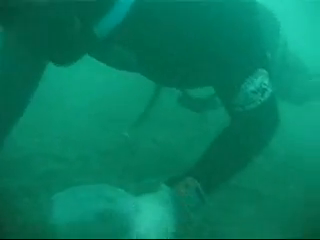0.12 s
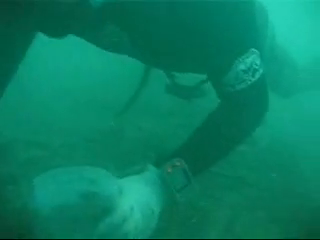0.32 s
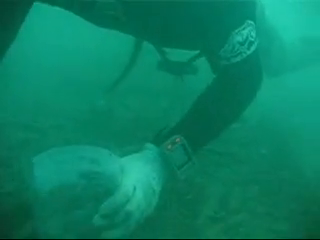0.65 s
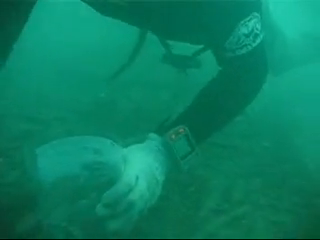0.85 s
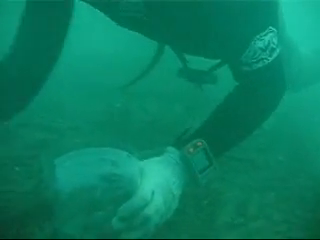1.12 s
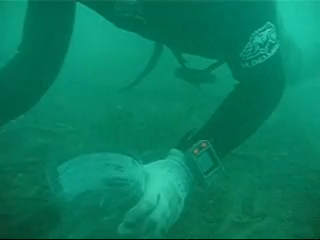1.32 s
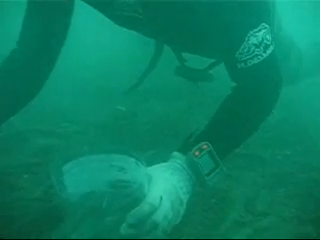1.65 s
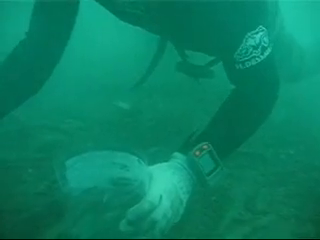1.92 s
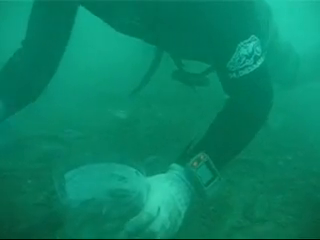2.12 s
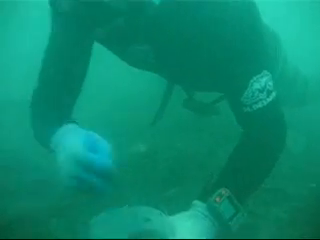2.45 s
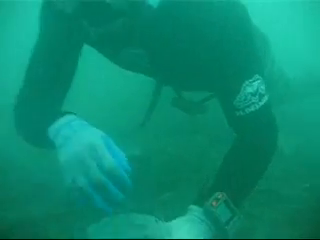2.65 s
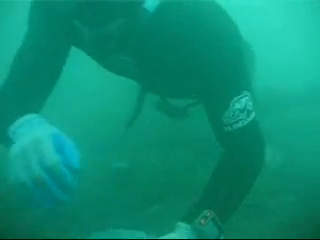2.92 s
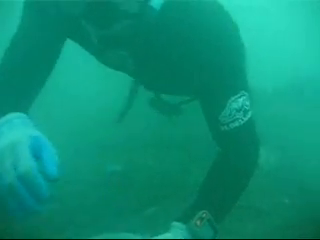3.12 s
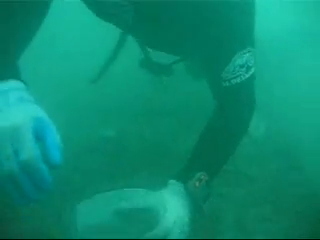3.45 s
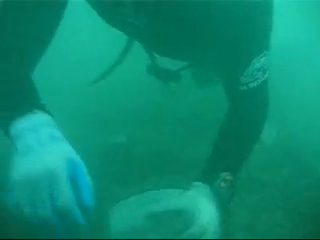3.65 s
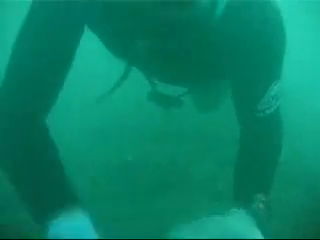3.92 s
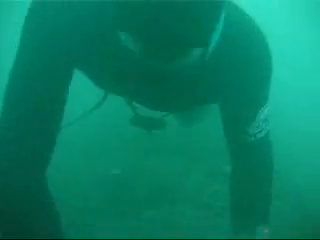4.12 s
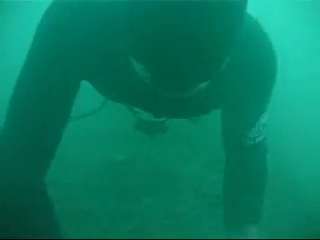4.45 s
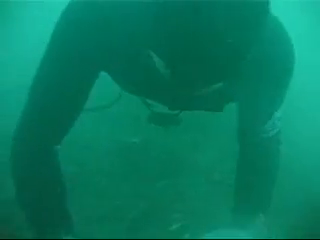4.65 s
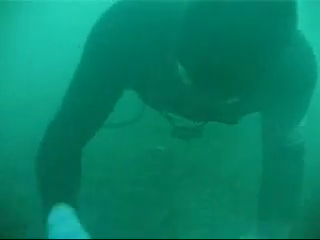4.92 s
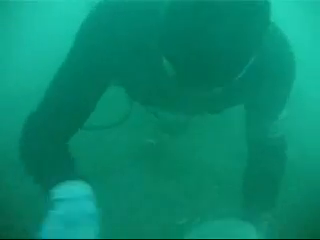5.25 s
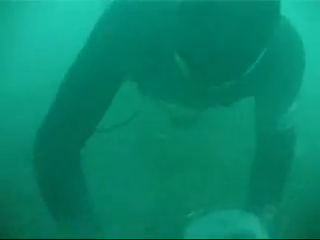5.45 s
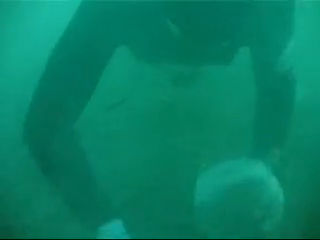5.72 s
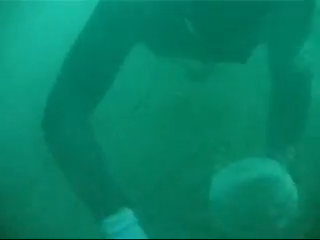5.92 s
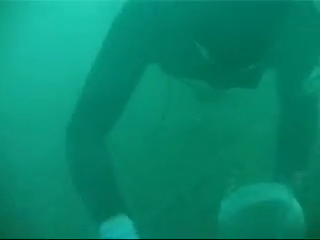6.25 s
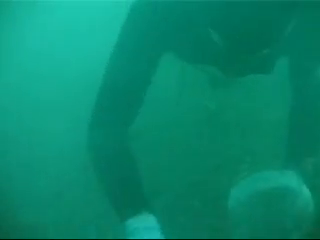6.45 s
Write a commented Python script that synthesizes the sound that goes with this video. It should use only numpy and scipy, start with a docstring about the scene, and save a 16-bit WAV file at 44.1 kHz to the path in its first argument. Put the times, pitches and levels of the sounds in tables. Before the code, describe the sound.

A small mono microphone sealed in a plastic housing hears a diver working on the seabed. Deep pulses and muffled rumble run throughout beneath a thin sea hiss. Two early bursts of knocks give way to a calmer stretch, then a hard rattling cluster. Later come rounded bumps, small scrapes, scattered taps and slightly stronger sloshing. Everything is close, boxy and dull.

```python
"""A slow throb, a near sine that swells and wanders in pitch, under water near the seabed. It and a dull
rumble of low noise shake a plastic camera housing held by a diver, with one small mono microphone inside.
Hands and gear knock, scrape, bump and rub: pushes and grains of noise ring the modes of the housing.
Thin high tones pip faintly. Behind them water sloshes, the low shell modes hum and the sea hisses, as
filtered noise and noise through the modes, and a narrow strip of treble noise flares briefly."""
import sys
import numpy as np
from scipy import signal
from scipy.fft import rfft, irfft, next_fast_len
from scipy.io import wavfile
from scipy.ndimage import uniform_filter1d

SR = 44100
rng = np.random.default_rng(int(sys.argv[2]) if len(sys.argv) > 2 else 0)


def wav_out(sig):
    """Save sig, one row per channel (or a flat mono array), as 16-bit PCM at SR to the path in sys.argv[1]."""
    wavfile.write(sys.argv[1], SR, np.round(np.clip(np.atleast_2d(sig).T, -1, 1) * 32767).astype(np.int16))


def natural_amplitude(level_db):
    """Convert a level in decibels to a linear amplitude factor, elementwise."""
    exponent = np.asarray(level_db, float) / 20
    return 10 ** exponent


N = 290619   # length in samples

# Low shell modes of the housing. Each row: pitch in Hz, width in Hz, relative level in the hum in dB,
# relative level under a knock in dB.
SHELL_MODES = [(450, 66.6, 6, 9), (452, 69, -27, 12.5), (598, 51, -15.5, -5.5), (641, 109, -1, -11.5),
               (880.6, 74, 0.5, -17.5), (1158, 36, -9.5, -5.5)]
# High plate modes of the housing. Each row: pitch in Hz, width in Hz, relative level in dB.
PLATE_MODES = [(1500, 210, 1.5), (2068, 230, 1), (2526, 68, 4), (3092, 120, 3.5), (3524, 100, -10),
               (3790, 47, 4), (900, 110, -6.5), (1190, 110, -5)]
CRACK_TOP_HZ, SCRAPE_TOP_HZ = 4600, 4150


def rms_one(x):
    """Scale to rms 1."""
    return x / np.sqrt(np.mean(x ** 2) + 1e-20)


def in_time(rows):
    """Join the rows of a curve by straight lines; the first column is the time in seconds."""
    s, *columns = np.transpose(rows)
    return [np.interp(np.arange(N) / SR, s, c) for c in columns]


def drift(per_s):
    """Slow chance: random points, per_s of them a second, joined by lines and scaled to rms 1."""
    steps = rng.standard_normal(1000)
    return rms_one(np.interp(np.arange(N) / SR * per_s, np.arange(1000), steps))


def bells_db(rows, spread, base_db):
    """Level of bell-shaped swells (centre s, dB, length ms) added in power to a base level."""
    t, power = np.arange(N) / SR, natural_amplitude(2 * base_db)
    for centre_s, db, length_ms, *_ in rows:
        bell = np.exp(-((t - centre_s) * 1000 / (spread * length_ms)) ** 2)
        power = power + natural_amplitude(2 * db) * bell
    return 10 * np.log10(power)


def resonance(x, hz, width_hz):
    """Two-pole band-pass with gain 1 on top."""
    r = np.exp(-np.pi * width_hz / SR)
    feedback = [1, -2 * r * np.cos(2 * np.pi * hz / SR), r * r]
    return signal.lfilter([(1 - r * r) / 2, 0, (r * r - 1) / 2], feedback, x)


def ringing(x, modes):
    """Parallel modes (Hz, width Hz, dB) with alternating signs."""
    return sum(natural_amplitude(db) * resonance(x, hz, width) * (-1) ** k for k, (hz, width, db) in enumerate(modes))


def band(x, low_hz, high_hz):
    """Steep band-pass."""
    return signal.sosfilt(signal.butter(3, [low_hz, high_hz], "band", fs=SR, output="sos"), x)


def coloured(spectrum, patchy_db):
    """Noise of a given spectrum; each overlapping quarter-octave flickers on its own."""
    size = next_fast_len(N)
    octave = np.log2(np.maximum(np.fft.rfftfreq(size, 1 / SR), 1))
    points, db = np.transpose(spectrum)
    shape = natural_amplitude(np.interp(octave, np.log2(points), db, left=-99, right=-99))
    bins, out = rfft(rng.standard_normal(size)) * shape, 0
    for centre in np.arange(3, 13.5, 0.25):
        share = np.clip(1 - 4 * abs(octave - centre), 0, 1)
        if (share * shape).max() > 1e-4:   # skip silent strips
            out = out + irfft(bins * share, size)[:N] * natural_amplitude(patchy_db * drift(20))
    return rms_one(out)


def throb():
    """A near sine whose phase wanders, as of a wide low resonance shaken at random."""
    # The throb comes in swells. Each row: centre in seconds, peak level in dB, length in ms, pitch in Hz.
    swells = [(0.17, -21.5, 67, 36.84), (0.29, -34, 71, 35.7), (0.46, -28, 110, 34.9),
              (0.57, -25.5, 37, 39.5), (0.69, -21.5, 39, 37.7), (0.82, -27.5, 28, 36.84),
              (0.93, -25.5, 114, 37), (1.2, -28, 170, 36.3), (1.32, -26, 35, 34.2),
              (1.52, -26.5, 113, 37.6), (1.66, -32, 49, 37.3), (1.83, -30.5, 70, 37.83),
              (1.96, -24.5, 61, 36.66), (2.1, -26.5, 46, 36.45), (2.17, -25.5, 26.6, 39.46),
              (2.28, -28, 99, 39.3), (2.43, -40, 45, 36.38), (2.58, -24.5, 111, 37.5),
              (2.69, -30, 47, 36.3), (2.83, -31, 26, 36.8), (2.91, -30.5, 26, 37), (2.95, -31.5, 150, 35.3),
              (3.11, -47, 34, 36.16), (3.28, -26.5, 110, 36.81), (3.58, -28.5, 129, 37.92),
              (3.74, -27.5, 38, 38.74), (3.88, -27, 83, 38.43), (4.21, -29.5, 132, 36.39),
              (4.44, -29.5, 204, 38.7), (4.6, -45, 46, 34.54), (4.75, -37, 39, 38.98),
              (4.96, -34, 88, 38.46), (5.12, -32, 64, 36.4), (5.24, -32.5, 72, 33.4),
              (5.39, -33, 103, 35.44), (5.67, -30, 39, 38.77), (5.76, -43, 37, 37.16),
              (5.88, -34, 60, 36.86), (6.1, -24.5, 65.5, 37.75), (6.34, -26.5, 158, 38.08)]
    lull_db, lull_waver_db, spread = -40, 5, 0.49   # level between swells; bell width per length
    _, _, hz = in_time(swells)
    level_db = bells_db(swells, spread, lull_db + lull_waver_db * drift(5.1))
    phase = 2 * np.pi * np.cumsum(hz + 1.2 * drift(7)) / SR
    return np.sqrt(2) * natural_amplitude(level_db) * np.sin(phase)


def rumble(extra_db):
    """Dull, patchy low noise that rises a little as the water is stirred."""
    # Spectrum of the rumble. Each row: frequency in Hz, relative density in dB per Hz.
    spectrum = [(8, -14), (15, 3), (29, 2), (46, 3.5), (54, -3), (64, 2.5), (85, -6.5), (110, -16),
                (126, -19), (145, -14.5), (175, -23), (215, -39.5)]
    level_db, follows = -39, 0.19   # level of the 50-110 Hz band at the usual stir; dB per dB of stir
    noise = coloured(spectrum, patchy_db=1.34)
    noise = noise / np.std(band(noise, low_hz=50, high_hz=110))
    return natural_amplitude(level_db + follows * extra_db) * noise


def knocks():
    """Each contact, a push and a dying scrape, rings the shell, rocks the housing and cracks in the plate."""
    # Sharp contacts. Each row: start in seconds, shell peak in dB, thud level in dB, crack level in dB,
    # crack pitch in Hz.
    contacts = [(0.2172, -30, -40, -38.5, 2300), (0.2194, -36, -47, -39.5, 1200),
                (0.236, -50, -64, -48, 3100), (.699, -59, -51, -55, 1350), (1.103, -26.5, -42, -36.5, 900),
                (1.1035, -49, -60, -51, 2900), (1.107, -32, -42.5, -42.5, 1000),
                (1.12, -37, -62, -55, 3000), (1.112, -40, -47, -54, 2600), (1.342, -50, -62, -57, 1330),
                (2.746, -41, -36.5, -58, 2500), (2.764, -30, -44, -61, 1195),
                (2.772, -35, -38.5, -55, 1100), (2.7915, -27, -42, -39, 3300),
                (2.7935, -30, -45, -42, 1500), (2.7988, -13, -28, -33, 1150), (2.8, -40, -50, -38, 2100),
                (2.8055, -28, -38, -38, 1100), (2.813, -26, -38, -45, 3300), (2.822, -40, -41, -46, 1012),
                (2.836, -30.5, -40, -54, 1000), (2.867, -39, -49, -51, 1500), (2.881, -31, -54, -52, 1700),
                (2.895, -37, -38.5, -51.5, 1915), (3.0131, -31, -44.5, -40.5, 1930),
                (3.199, -39, -52, -56, 1340), (3.4256, -34.5, -38.5, -46, 2183),
                (3.733, -43, -35, -52, 1200), (3.7335, -60, -60, -49.5, 3500), (3.742, -36, -44, -60, 1007),
                (3.75, -38, -43, -65, 1000), (3.758, -41, -44, -54, 900), (4.597, -31, -44, -62, 847),
                (4.603, -36.5, -39, -51, 900), (4.71, -39, -52, -50, 1500),
                (4.7545, -32.5, -47, -44.5, 1400), (4.759, -45, -55, -56, 3003), (4.8, -45, -74, -51, 987),
                (5.108, -35.5, -57, -51, 1200), (5.295, -37, -53, -64, 1172), (5.419, -49, -50, -50, 2200),
                (5.497, -57, -39, -43, 2440), (5.501, -57, -61, -44, 2300), (5.514, -55, -60, -50, 2700),
                (5.544, -55, -55, -49, 2420), (5.55, -46, -54, -47, 2000), (5.562, -51, -58, -44.5, 2630),
                (5.744, -49, -59, -40.5, 2330), (5.979, -37.5, -49, -65, 1500),
                (6.1122, -45, -55, -42, 3500), (6.113, -35, -41.5, -40, 1500), (6.193, -40, -70, -56, 1500),
                (6.275, -36, -64, -53, 1296)]
    # The housing rocking in the hands. Each row: pitch in Hz, width in Hz, relative level in dB.
    thud_modes = [(156, 146, 4.5), (204.6, 76, 3)]
    rise_ms, scrape_rise_ms = 0.27, 0.51
    # contact time at a hard crack; dB longer per dB of weaker crack
    hard_contact_ms, hard_db, softening = 2.2, -39, 0.24
    spot_db, spot_detune = 2, 0.017   # each spot struck shifts mode strengths, and all pitches by a share
    snap_height = 5.7   # the first sharp touch, one sample long
    length, head = 6000, 500   # samples
    t_ms, out = np.arange(length) / SR * 1000, np.zeros(N + length)
    scrape_noise = rng.standard_normal((len(contacts), length))
    spots = rng.standard_normal((len(contacts), 1 + len(SHELL_MODES) + len(PLATE_MODES)))
    modes = [(hz, width, db) for hz, width, _, db in SHELL_MODES] + PLATE_MODES
    upper_shell = [mode[:3] for mode in SHELL_MODES[2:]]
    for (s, shell_db, thud_db, crack_db, crack_hz), scrape, spot in zip(contacts, scrape_noise, spots):
        detune = 1 + spot_detune * spot[0]
        struck = [(hz * detune, width, db + spot_db * chance)
                  for (hz, width, db), chance in zip(modes, spot[1:])]

        contact_ms = max(hard_contact_ms * natural_amplitude(softening * (hard_db - crack_db)), 0.3)
        onset = 1 - np.exp(-(t_ms / scrape_rise_ms) ** 2)
        force = scrape * np.exp(-t_ms / contact_ms) * onset + 1e-18
        push = force + 7.0 * (t_ms / rise_ms) * np.exp(-t_ms / rise_ms)
        snap = push + snap_height * (t_ms == 0)

        shell = band(ringing(push, struck[:len(SHELL_MODES)]), 270, 1400)
        thud = band(ringing(push, thud_modes), 86, 460)
        crack = ringing(snap, struck[len(SHELL_MODES):]) + 0.36 * snap + 2.0 * ringing(push, upper_shell)
        for _ in range(2):   # gather the crack round its own pitch
            crack = resonance(crack, crack_hz, 1.22 * crack_hz)
        crack = band(band(crack, 0.58 * crack_hz, SCRAPE_TOP_HZ), 310, CRACK_TOP_HZ)

        at = round(s * SR)
        out[at:at + length] += natural_amplitude(shell_db) * shell / abs(shell).max()
        for part, db in (thud, thud_db), (crack, crack_db):   # level = rms of the first moments
            out[at:at + length] += natural_amplitude(db) * part / np.std(part[:head])
    return out[:N]


def scrapes():
    """Dense grains of sand and fabric under a short stroke, coloured by a broad shell band."""
    # Gritty strokes of gloves and gear on the shell. Each row: centre in seconds, level in dB,
    # length in ms, centre pitch in Hz.
    strokes = [(0.215, -46.5, 37, 3100), (1.115, -56.5, 37, 1500), (2.46, -55, 40, 800),
               (2.62, -51, 37, 900), (2.752, -54, 34, 2583), (2.787, -49, 17.5, 2800),
               (2.81, -45.5, 39, 1100), (2.835, -54.5, 52, 2202), (2.89, -53, 51, 1990),
               (3.015, -55, 31, 2520), (3.422, -54, 35, 4600), (3.77, -56, 25, 750), (4.765, -62, 25, 3200),
               (5.125, -50.5, 51, 1800), (5.52, -55, 40, 2585), (5.553, -47, 34, 2480),
               (5.77, -49.5, 110, 2434), (6.11, -49, 31, 3240)]
    grit_per_s, grit_spread_db, spread = 3500, -5, 0.52   # the last is bell width per length
    hits = rng.random(N) < grit_per_s / SR
    grain_db = grit_spread_db * np.minimum(rng.exponential(1, N), 3)
    grit = hits * natural_amplitude(grain_db) * rng.choice([-1, 1], N)
    out, reach = np.zeros(N), 4000
    for s, db, length_ms, hz in strokes:
        at = slice(round(s * SR) - reach, round(s * SR) + reach)
        top_hz = max(SCRAPE_TOP_HZ, 1.3 * hz)
        age_ms = np.arange(-reach, reach) * 1000 / SR
        stroke = np.exp(-(age_ms / (spread * length_ms)) ** 2)
        rub = resonance(grit[at], hz, 1.1 * hz)
        rub = band(band(rub, 480, top_hz), 360, top_hz)
        out[at] += natural_amplitude(db) * stroke * rms_one(rub)
    return out


def bumps():
    """A glove presses slowly, so a single mode swells and fades without a click."""
    # Soft presses. Each row: start in seconds, peak in dB, pitch in Hz, time to the peak in ms.
    presses = [(.565, -48, 440, 7.8), (1.927, -38, 461, 6.5), (2.445, -40, 474, 7),
               (2.456, -35.5, 467, 5.1), (3.319, -38.5, 480, 7), (3.622, -47, 470, 8.5),
               (4.388, -38, 451.6, 3.1), (4.556, -31, 180, 9.9), (4.57, -36, 136.3, 14),
               (4.577, -26.5, 430, 6.9), (4.643, -42, 467, 8.5), (4.676, -31.5, 463, 4.7),
               (4.85, -39, 435, 6), (5.151, -41, 488, 11), (5.318, -41.5, 216, 21), (5.401, -44, 212.3, 44),
               (5.553, -33.5, 461, 15), (5.589, -39, 462, 8.7), (5.862, -36.5, 464.6, 8.9)]
    t, out = np.arange(N) / SR, np.zeros(N)
    for s, peak_db, hz, swell_ms in presses:
        at = round(s * SR)
        age_s = t[:min(8000, N - at)]
        age = age_s * 1000 / swell_ms
        swell = (age * np.exp(1 - age)) ** 2
        tone = np.sin(2 * np.pi * hz * age_s + rng.uniform(0, 2 * np.pi))
        out[at:at + len(age)] += natural_amplitude(peak_db) * swell * tone
    return out


def rustle(flicker_db):
    """Neoprene gloves shifting on the housing rub in short swells, in step with the treble strip."""
    usual_db, follows = -59, 0.9   # level at the usual flicker; dB per dB of flicker
    rub = rms_one(band(rng.standard_normal(N), 420, 1595))
    return natural_amplitude(usual_db + follows * (flicker_db - np.median(flicker_db))) * rub


def pips():
    """Thin high tones: steady sines with soft edges."""
    # Faint tones. Each row: start in seconds, length in ms, level in dB, pitch in Hz.
    tones = [(4.553, 47, -58, 4822), (4.553, 45, -60.5, 6170), (5.019, 30, -51, 4826)]
    edge_ms = 8.5
    t, out = np.arange(N) / SR, 0
    for s, length_ms, db, hz in tones:
        age_ms = (t - s) * 1000
        gate = np.clip(np.minimum(age_ms, length_ms - age_ms) / edge_ms, 0, 1)
        out = out + np.sqrt(2) * natural_amplitude(db) * gate * np.sin(2 * np.pi * hz * t)
    return out


def stir():
    """How strongly water is stirred round the housing, as the slosh level in dB."""
    # Stirring of the water. Each row: time in seconds, slosh level in dB.
    curve = [(0.0, -55), (0.33, -54), (0.83, -60), (1.17, -57), (2.11, -58.5), (2.9, -60), (3.21, -56),
             (3.65, -56), (4.22, -60), (4.48, -60), (4.61, -53.5), (5.29, -51), (6.04, -51), (6.15, -58),
             (6.44, -58), (6.59, -62)]
    return in_time(curve)[0]


def slosh(stir_db):
    """Stirred water: patchy noise in a low-mid band, riding on the stir."""
    # Spectrum of the slosh. Each row: frequency in Hz, relative density in dB per Hz.
    spectrum = [(160, -22.5), (195, -1), (250, -5), (310, -5.5), (360, -8), (410, -34.5)]
    return natural_amplitude(stir_db) * coloured(spectrum, patchy_db=5.0)


def shell_hum(extra_db):
    """The sea keeps the low shell modes softly ringing, in lumps."""
    level_db, follows = -50, 0.083   # level at the usual stir; dB per dB of stir
    level_db = level_db + follows * extra_db + 0.22 * drift(4.1)
    sea = rng.standard_normal(N) * natural_amplitude(2.0 * drift(27))
    hum = band(ringing(sea, [mode[:3] for mode in SHELL_MODES]), 337, 1400)
    return natural_amplitude(level_db) * rms_one(hum)


def hiss(extra_db, flicker_db):
    """Sea noise, direct and through the plate modes; its top dips while the treble strip flares."""
    # Spectrum of the direct hiss. Each row: frequency in Hz, relative density in dB per Hz.
    spectrum = [(500, -21.5), (740, -12), (1260, -6), (2500, -1), (2810, -5.5), (3100, -3), (3950, -5),
                (4200, -9.5), (5000, -12), (5370, -6.5), (5600, -10), (6200, -19), (6400, -16.5),
                (7300, -34), (8500, -54.5)]
    direct_db, follows = -53, 0.19   # level of the whole sea hiss, direct and plate together, at the usual stir; dB per dB of stir
    duck_share, duck_hz = 0.81, 4220   # dip in dB per dB of flicker, above this frequency
    level_db = direct_db + follows * extra_db + 0.84 * drift(14)
    plate = band(ringing(rng.standard_normal(N), PLATE_MODES), 1100, CRACK_TOP_HZ)
    sea = coloured(spectrum, patchy_db=2.0) + natural_amplitude(-3.5) * rms_one(plate)
    sea = rms_one(sea)
    high = signal.sosfiltfilt(signal.butter(4, duck_hz, "high", fs=SR, output="sos"), sea)
    duck = natural_amplitude(-duck_share * (flicker_db - np.median(flicker_db)))
    return natural_amplitude(level_db) * (sea + high * (duck - 1))


def treble_flicker():
    """Level of the treble strip in dB: brief flares over a wavering calm."""
    # Brief flares of the treble. Each row: centre in seconds, peak level in dB, length in ms.
    flares = [(0.232, -56.5, 40), (0.383, -62.5, 30), (0.452, -62, 18), (0.509, -61, 23), (0.577, -68, 31),
              (0.702, -61.5, 27), (0.884, -60, 93), (1.112, -58.5, 30), (1.349, -58.5, 25),
              (1.474, -60.5, 26), (1.617, -63.5, 51), (2.471, -63.5, 35), (2.597, -59.5, 25),
              (2.795, -51, 32), (2.876, -56, 13), (2.944, -61, 44), (3.012, -58.5, 44), (3.214, -62, 90),
              (3.339, -65, 29), (3.772, -60.5, 23), (3.909, -59, 22), (3.969, -62.5, 33), (4.041, -65, 19),
              (4.23, -62, 19), (4.593, -67.5, 77), (4.782, -65, 52), (5.03, -63.5, 25), (5.12, -56.5, 20),
              (5.215, -60, 26.0), (5.313, -63.5, 24), (5.568, -57, 28), (5.72, -65.5, 44),
              (5.91, -61.5, 28), (6.111, -53.5, 28), (6.205, -61, 25), (6.278, -59.5, 16.2),
              (6.357, -64.5, 54)]
    calm_db, calm_waver_db, spread = -70, -2, 0.43   # level between flares; bell width per length
    return bells_db(flares, spread, calm_db + calm_waver_db * drift(24))


def top_band(flicker_db):
    """A narrow strip of treble noise whose level flickers, with a faint broad skirt round it."""
    edges = signal.cheby2(14, 60, [6310, 7360], "band", fs=SR, output="sos")
    white = rng.standard_normal(N)
    strip = rms_one(signal.sosfilt(edges, white))
    return natural_amplitude(flicker_db) * (strip + natural_amplitude(-16) * rms_one(band(white, 4900, 7920)))


def slotted(x):
    """Narrow slots of the noise drop out for a few hundredths of a second: a hollow, broken grain."""
    share, depth_db, low_hz, high_hz = 0.006, -26, 230, 4000   # share of cells where a slot opens
    hz, _, cells = signal.stft(x, SR, nperseg=1024)
    in_range = ((hz > low_hz) & (hz < high_hz))[:, None]
    opens = (rng.random(cells.shape) < share) * in_range * 1.0
    # each slot spreads over 3 bins and 5 frames
    spread = uniform_filter1d(uniform_filter1d(opens, size=3, axis=0), size=5, axis=1)
    shut = spread > 1e-3
    return signal.istft(cells * natural_amplitude(depth_db * shut), SR, nperseg=1024)[1][:N]


def scene():
    """All sources reach one microphone inside the housing."""
    stir_db = stir()
    extra_db = stir_db - np.median(stir_db)
    flicker_db = treble_flicker()
    water = rumble(extra_db) + slosh(stir_db) + shell_hum(extra_db) + hiss(extra_db, flicker_db)
    noises = slotted(water + scrapes() + rustle(flicker_db))
    mix = throb() + noises + pips() + top_band(flicker_db) + knocks() + bumps()
    return mix[None]


def top_cut(x):
    """Nothing passes above the cut-off."""
    return signal.sosfilt(signal.butter(12, 9060, fs=SR, output="sos"), x)


def record(dry):
    """The converter adds a constant offset."""
    offset = -0.0181   # of full scale
    return top_cut(dry + offset)


dry = scene()
out = record(dry)
wav_out(out)
```